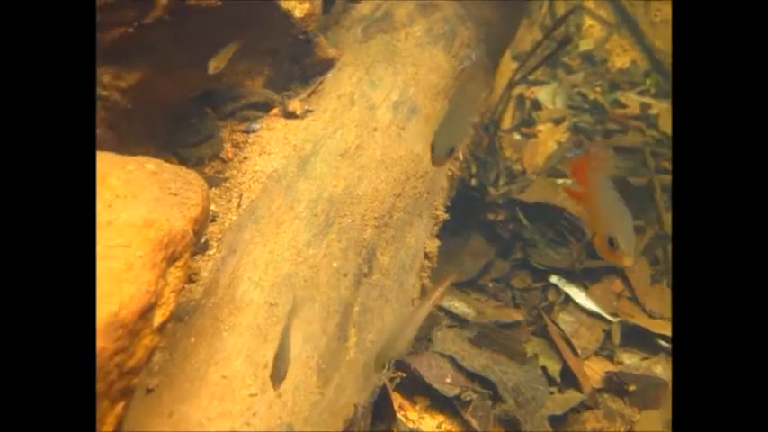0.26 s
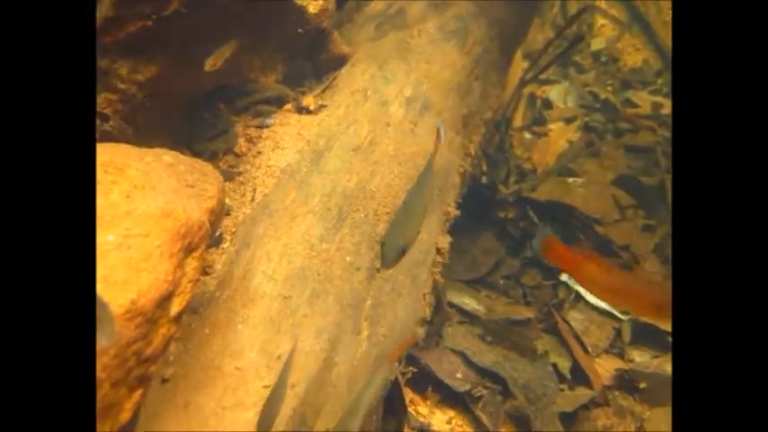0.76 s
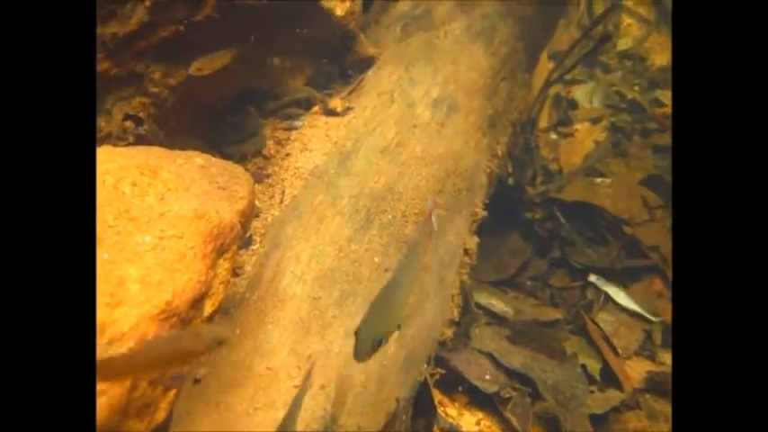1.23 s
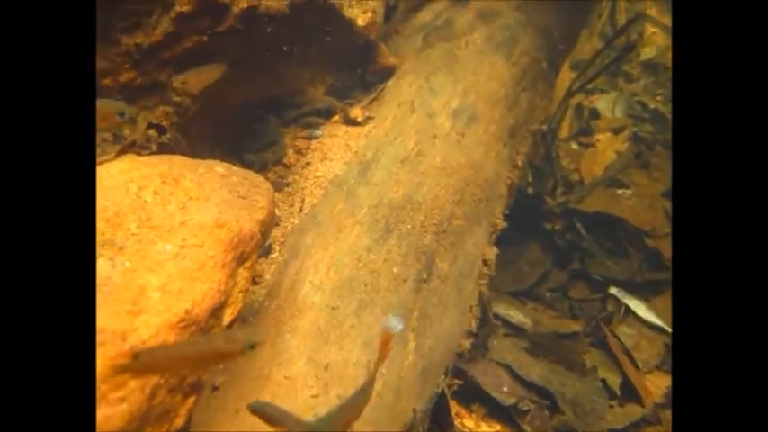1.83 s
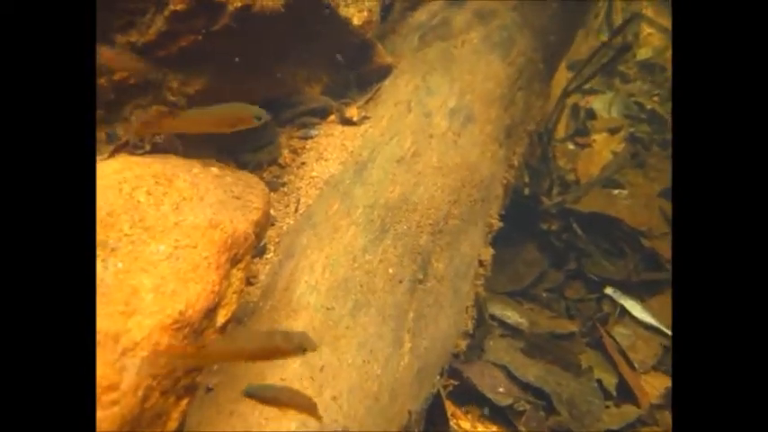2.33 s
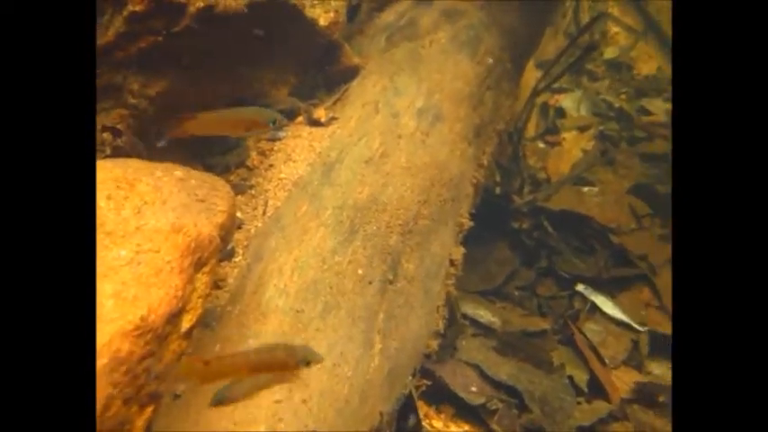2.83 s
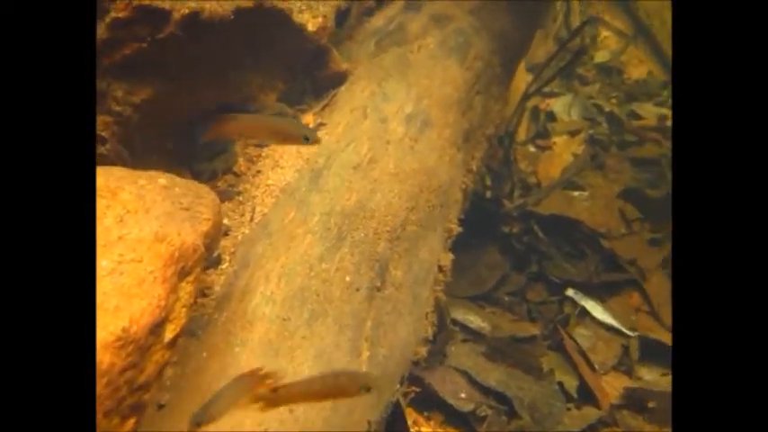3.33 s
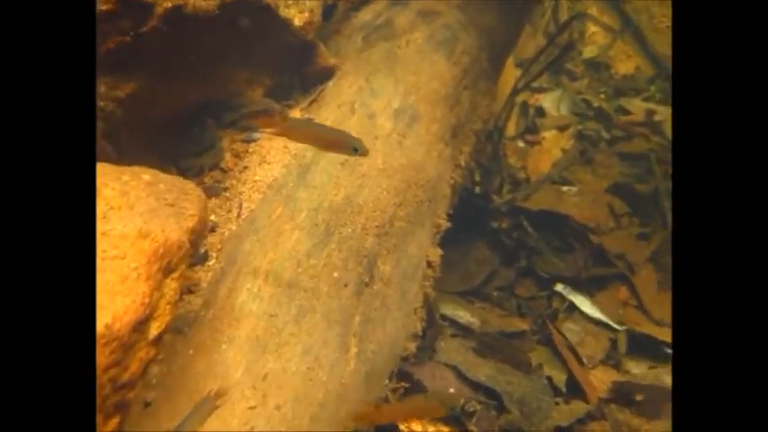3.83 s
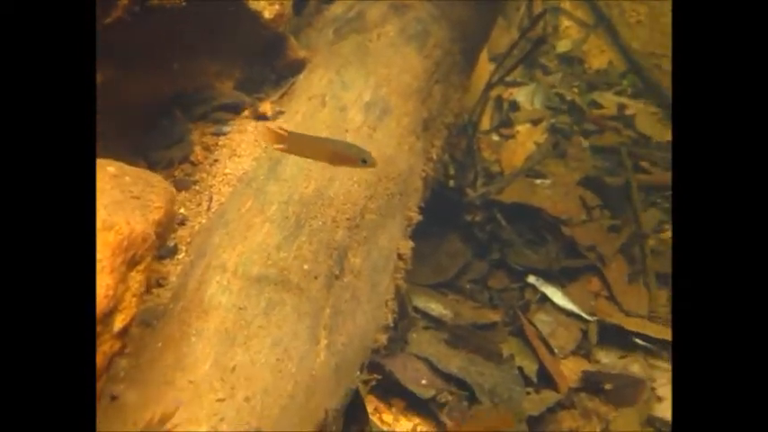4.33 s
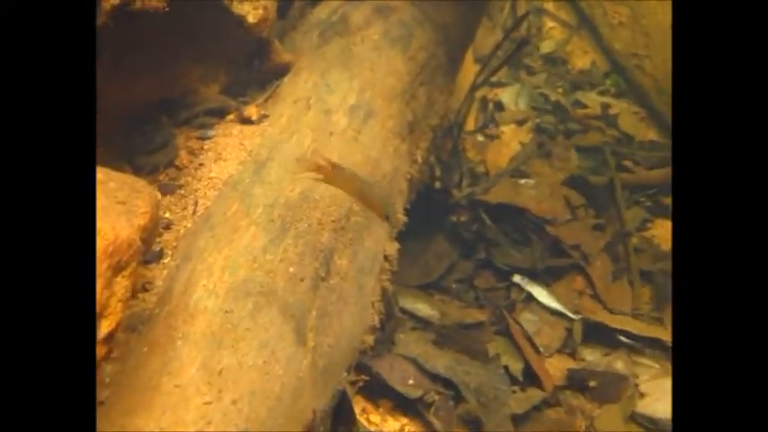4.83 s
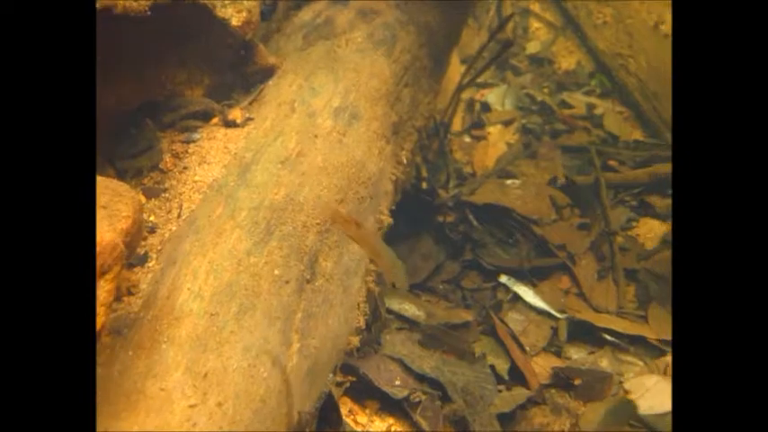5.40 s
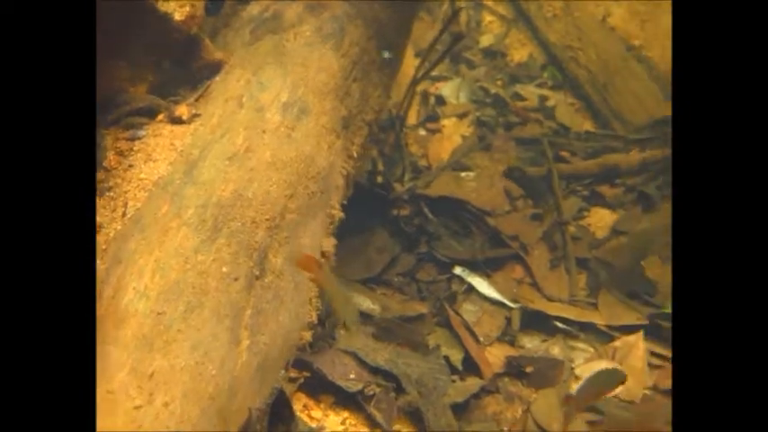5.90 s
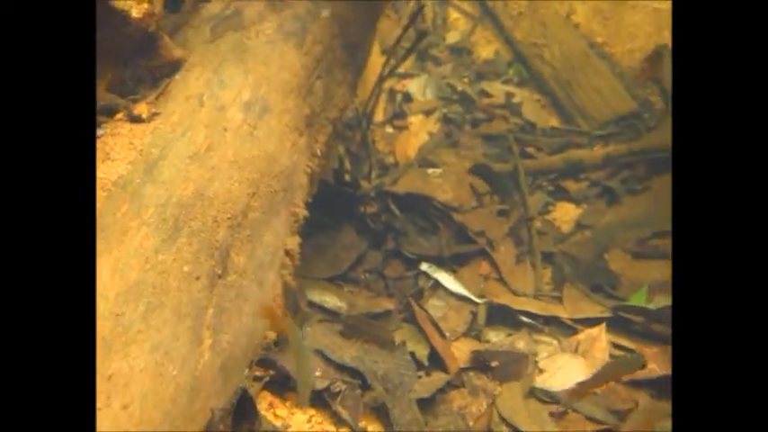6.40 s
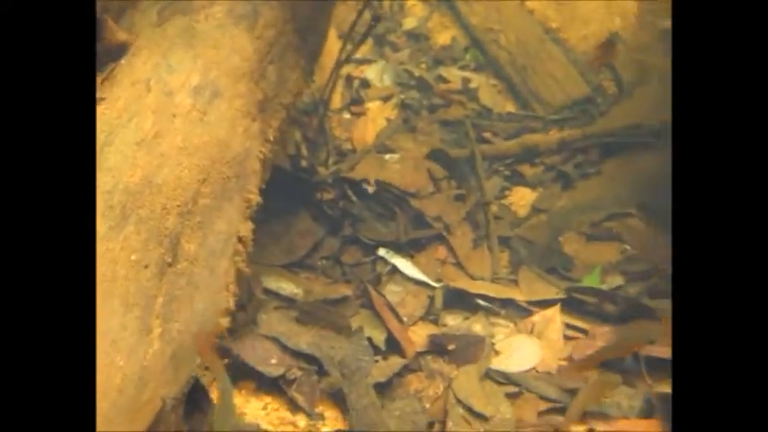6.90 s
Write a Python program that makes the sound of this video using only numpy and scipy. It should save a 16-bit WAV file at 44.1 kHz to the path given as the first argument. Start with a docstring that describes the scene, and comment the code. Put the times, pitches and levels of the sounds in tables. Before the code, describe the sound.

Heard from inside a sealed housing under a shallow stream, the current makes a soft hollow roar and lumpy rumble. Dull knocks, taps and low thuds strike the shell irregularly, with a loud clacking cluster near the start and another at one second. Later hits are sparser and softer, with a few big bubble plops. A faint hiss and thin high whine stay steady. The fish make no sound.

```python
"""Camera under a stream

A camera in a sealed housing lies under a shallow stream. Bubbles and grains tap the shell and make it ring,
eddies push its wall with low thuds, three large bubbles plop, and hard contacts snap like ticks.
Behind them, noise shaped by the housing's resonances makes the current's faint roar, and low noise its rumble.
The electronics add steady noise as hiss, a pure high tone and a whine made of a broken-up sine."""
import sys
import numpy as np
from scipy import signal
from scipy.fft import rfft, irfft, next_fast_len
from scipy.io import wavfile
from scipy.ndimage import map_coordinates

SR = 44100
rng = np.random.default_rng(int(sys.argv[2]) if len(sys.argv) > 2 else 0)


def ratio(d):
    """dB to gain"""
    e = np.asarray(d, float) / 20
    return 10 ** e


def pcm_store(signal):
    """Save signal as 16-bit PCM."""
    levels = np.round(np.clip(np.atleast_2d(signal), -1, 1) * 32767)
    wavfile.write(sys.argv[1], SR, levels.astype(np.int16).T)


N = 315315  # length in samples, 7.15 s


def unit(x):
    """Scale x so that its average strength (rms) is 1."""
    return x / np.sqrt(np.mean(x ** 2) + 1e-20)


def along(points, hz):
    """Read a curve of (frequency, value) points, with frequency on a log axis."""
    f, value = np.transpose(points)
    return np.interp(np.log(hz + 1), np.log(f + 1), value)


def over_time(points):
    """Draw straight lines between (time, value) points, one value per sample."""
    return np.interp(np.arange(N) / SR, *np.transpose(points))


def wobble(rate):
    """A smooth random curve with `rate` random points a second."""
    knots = rng.standard_normal(int(N * rate / SR) + 4)
    return map_coordinates(knots, [np.arange(N) * rate / SR])


def filtered(x, response):
    """Multiply the spectrum of x by a response that depends on frequency."""
    size = next_fast_len(N + 8192)
    hz = np.fft.rfftfreq(size, 1 / SR)
    return irfft(rfft(x, size) * response(hz), size)[..., :N]


def noise(response):
    """Noise coloured by a response, at rms 1."""
    return unit(filtered(rng.standard_normal(N), response))


def ring(modes, db, t, attack):
    """Fading sine waves of a struck body: one row per blow, db gives each blow's strength in each mode."""
    hz, level, t60 = (np.array(column)[None, :, None] for column in zip(*modes))
    fading = ratio(db[:, :, None] + level - 60 * t / t60)
    waves = fading * np.sin(2 * np.pi * hz * t)
    return waves.sum(1) * (1 - np.exp(-t / attack)) ** 2


def placed(seconds, rows):
    """Add up short sounds, each starting at its own moment."""
    at = np.round(seconds * SR).astype(int)[:, None] + np.arange(rows.shape[1])
    # samples outside the scene land in a spare last slot or at sample 0
    return np.bincount(np.clip(at, 0, N).ravel(), rows.ravel(), N + 1)[:N]


# ways the shell rings when tapped: f/Hz, level/dB, t60/s (time to fade by 60 dB)
SHELL_MODES = [(450, 2, 0.026), (564.4, 2, 0.031), (732, -9, 0.061), (880, -5, 0.026), (1029, 13.5, 0.01),
               (1194, 5.5, 0.017), (1434, 1.5, 0.018), (1900, -10, 0.0072)]


def taps(s, db, centre_hz):
    """A bubble or grain taps the shell: a rounded blip at its pitch, then the nearest modes ring on."""
    hz = np.array([mode[0] for mode in SHELL_MODES])
    t = np.arange(SR // 20) / SR
    octaves_away = np.abs(np.log2(hz / centre_hz[:, None]))
    strength = db[:, None] + 5.5 - 45 * octaves_away
    strength = strength + 3.9 * rng.standard_normal(strength.shape)  # no two taps ring alike
    cycles = t * centre_hz[:, None]
    bump = np.exp(-((cycles - 1.2) / 0.62) ** 2)
    blip = ratio(db[:, None] - 11) * bump * np.sin(2 * np.pi * cycles)
    return placed(s + 0.00028, blip + ring(SHELL_MODES, strength, t, attack=0.0012))


# ringing taps on the shell: t/s, level/dB, centre f/Hz, rim level/dB
TAP_EVENTS = [(0.042, -23, 885, -27), (0.064, -20.5, 533, -32), (0.107, -25, 527, -43),
              (0.142, -19, 800, -35), (0.183, -10, 790, -40), (0.189, -7, 810, -15),
              (0.196, -3.5, 900, -10), (0.207, -11, 860, -19), (0.364, -22, 564, -41),
              (0.452, -18, 750, -20.5), (0.473, -18, 800, -25), (0.513, -17, 794, -18.5),
              (0.538, -21, 765, -29), (0.559, -36, 900, -29), (0.602, -21.5, 540, -45),
              (0.94, -25.5, 510, -27), (0.991, -6.5, 737, -13.5), (1.0, -19, 596, -43),
              (1.008, -9, 750, -26), (1.045, -10.5, 880, -34), (1.058, -10, 880, -26),
              (1.078, -17.5, 430, -28), (1.081, -14.5, 740, -30), (1.151, -15.5, 730, -32),
              (1.241, -22, 770, -31), (1.258, -40, 500, -26), (1.28, -22.5, 510, -24.5),
              (1.3, -25, 474, -40), (1.309, -21, 820, -32), (1.473, -11, 804, -21),
              (1.658, -24.5, 470, -45), (2.158, -26, 450, -49), (2.227, -22, 490, -22),
              (2.298, -25.5, 550, -38), (2.654, -14, 870, -33), (2.664, -40, 500, -28),
              (2.691, -25, 780, -22), (2.778, -17.5, 730, -23), (2.783, -47, 450, -14.5),
              (3.011, -31, 500, -22.5), (3.023, -20.5, 410, -26), (3.545, -41, 500, -21),
              (3.76, -24, 470, -28.5), (3.918, -23.5, 810, -25), (3.985, -27.5, 450, -51),
              (4.105, -22.5, 552, -35), (4.343, -22, 790, -27), (4.48, -15.5, 680, -40),
              (4.886, -29, 500, -32.5), (5.324, -24, 485, -31), (5.386, -21.5, 497, -45),
              (5.515, -30, 500, -26.5), (5.63, -24.5, 487, -45), (5.653, -23.5, 484, -45),
              (6.537, -26, 840, -36), (6.546, -38, 500, -22), (6.616, -34, 500, -24.5),
              (6.668, -23, 535, -48), (6.68, -21.5, 460, -47), (6.694, -20, 406, -15),
              (6.701, -25, 790, -40), (6.715, -19.5, 544, -33), (6.821, -23.5, 527, -45),
              (6.852, -23, 570, -47), (6.894, -38, 500, -30), (6.95, -27, 556, -45),
              (6.985, -22.5, 570, -45)]
# pitch at which the rim answers a tap: t/s, f/Hz
RIM_PITCH = [(0, 1274), (1.4, 1220), (2.6, 1400), (7.15, 1403)]


def knocks():
    """Each tap sounds at its own pitch; the rim and the body of the shell answer it."""
    s, db, centre_hz, rim_db = np.transpose(TAP_EVENTS)
    rim_hz = np.interp(s, *np.transpose(RIM_PITCH))
    rim = taps(s, rim_db, rim_hz)
    body = taps(s, db - 6.5, np.full(len(s), 500))  # dB relative to the tap, Hz
    return taps(s, db, centre_hz) + rim + body


def pushes(s, db, hz):
    """An eddy bends the wall in quickly, and it swings back more slowly."""
    u = np.arange(SR // 16) / SR * hz[:, None]  # time counted in periods of hz
    rise = (1 - np.exp(-u / 0.065)) ** 2
    swing = np.sin(2 * np.pi * u ** 0.54) * np.exp(-1.6 * u)  # a power below 1 slows the swing
    return placed(s + 0.00048, ratio(db[:, None] + 5.5) * rise * swing)


# low pushes on the shell: t/s, level/dB, f/Hz (sets how fast each push runs)
PUSH_EVENTS = [(0.142, -15.5, 190), (0.188, -16.5, 274), (0.21, -20, 200), (0.367, -24, 179),
               (0.45, -25, 181), (0.473, -24, 192), (0.513, -20, 202), (0.604, -21.5, 160),
               (0.993, -14, 170), (1.01, -19, 132), (1.025, -21, 160), (1.042, -23, 200),
               (1.057, -14.5, 255), (1.15, -20, 180), (1.244, -26, 119), (1.258, -14, 154),
               (1.3, -18.5, 210), (1.396, -19, 117), (1.458, -22, 202), (1.471, -16, 192),
               (1.508, -23, 220), (1.657, -22, 218), (1.932, -20, 186), (2.302, -21, 123),
               (2.544, -20, 140), (2.654, -15, 192), (2.668, -28, 140), (2.69, -14.5, 165),
               (2.731, -23, 202), (2.778, -10, 204), (2.783, -11, 110), (3.018, -16, 180),
               (3.052, -23, 100), (3.314, -25, 182), (3.363, -22, 136), (3.477, -24, 140),
               (3.545, -14.5, 180), (3.762, -24.5, 210), (3.918, -17.5, 174), (3.946, -16, 127),
               (3.962, -21, 140), (4.028, -23.5, 160), (4.343, -20, 149), (4.484, -10.5, 163),
               (4.713, -23, 98), (4.884, -24, 202), (5.264, -27, 140), (5.387, -19, 160),
               (5.459, -12.5, 150), (5.482, -22.5, 137), (5.624, -26.5, 150), (5.664, -17.5, 159),
               (5.848, -26.5, 90), (6.536, -18, 170), (6.545, -20.5, 112), (6.616, -16.5, 149),
               (6.653, -24, 200), (6.668, -19, 180), (6.694, -12, 147), (6.729, -21, 150),
               (6.746, -18, 172), (6.851, -21, 202), (6.984, -23.5, 161), (7.052, -23, 194)]


def eddy_pushes():
    """The clear low thuds, as eddies bend the wall at the listed moments."""
    return pushes(*np.transpose(PUSH_EVENTS))


# large bubbles: t/s, bend level/dB, ring level/dB
PLOP_EVENTS = [(1.8255, -10.5, -12), (5.16, -7, -8.5), (6.21, -14.5, -7.5)]


def plops():
    """A large bubble lets go of the shell: the wall is sucked out, swings back ever slower, and one mode sings."""
    s, bend_db, ring_db = np.transpose(PLOP_EVENTS)
    t = np.arange(-SR // 200, SR // 20) / SR
    before, after = np.minimum(t, 0), np.maximum(t, 0)
    bend_shape = np.exp(-(before / 0.00051) ** 2 - (after / 0.0055) ** 2)
    bend = np.cos(np.pi * (after / 0.0022) ** 0.6) * bend_shape
    sing_shape = np.exp(-(before / 0.0017) ** 2 - after / 0.0059)
    sing = np.cos(2 * np.pi * SHELL_MODES[1][0] * t) * sing_shape
    return placed(s + t[0], -ratio(bend_db)[:, None] * bend - ratio(ring_db)[:, None] * sing)


# hard ticks: t/s, level/dB, centre f/Hz, crack level/dB (relative to the tick)
TICK_EVENTS = [(.142, -37, 3010, -30), (.189, -28, 2400, -25), (.193, -24, 4500, -20),
               (.197, -3.5, 3600, -10), (.209, -20, 3050, -35), (.474, -40, 2840, -30),
               (.514, -34.5, 2760, -30), (0.989, -32, 2660, -21), (1.059, -12, 3370, -19),
               (1.074, -38, 4500, -30), (1.08, -34, 4500, -30), (1.402, -44, 2620, -30),
               (2.225, -38.5, 4250, -25), (2.296, -32, 4480, -10), (2.778, -33, 2400, -35),
               (3.96, -41, 4500, -30), (6.517, -39, 3960, -30)]
# ways the shell rings when ticked: f/Hz, level/dB, t60/s
TICK_MODES = [(1110, 7, 0.0072), (2400, -6.5, 0.011), (2750, -1.5, 0.0071), (4600, 1, 0.0045),
              (5380, -13.5, 0.0072)]


def ticks():
    """Hard contacts: a crack of noise, very short modes strongest near each tick's centre, a faint fizzing tail."""
    s, db, centre_hz, crack_db = np.transpose(TICK_EVENTS)
    hz = np.array([mode[0] for mode in TICK_MODES])
    t = np.arange(SR // 25) / SR
    strength = db[:, None] + 4.5 - 9 * np.abs(np.log2(hz / centre_hz[:, None]))
    modes = placed(s, ring(TICK_MODES, strength, t, attack=0.0001))

    shape = (len(s), len(t))
    crack = ratio((db + crack_db + 3)[:, None] - 60 * t / 0.0035) * rng.standard_normal(shape)
    fizz = ratio(db[:, None] - 17.5 - 60 * t / 0.028) * rng.standard_normal(shape)
    dull_crack = filtered(placed(s, crack), lambda f: 1 / (1 + 1j * f / 9000))
    tail = filtered(placed(s, fizz), lambda f: np.exp(-((f - 3200) / 1800) ** 2))
    return dull_crack + tail - modes


def patter(count=340):
    """Many faint pushes and taps at random moments under the clear ones; higher taps tend to be weaker."""
    push_s, tap_s = rng.random((count, 2)).T * N / SR
    a, b, c, d = rng.standard_normal((count, 4)).T
    faint_pushes = pushes(push_s, -35 + 3 * a, 110 * np.exp(0.5 * b))
    faint_taps = taps(tap_s, -39 + 3 * c - 4 * d, 750 * np.exp(0.498 * d))
    return faint_pushes + faint_taps


# slow strength of the eddies: t/s, level/dB
EDDY_STRENGTH = [(0, -33), (1, -41.5), (2.5, -44), (3.2, -41.5), (5, -42.5), (6.3, -43), (7.15, -41)]


def surges():
    """Loudness of the eddies' rumble: a slow strength, and a swell around each push."""
    surge_db, surge_s = -19, 0.022  # level relative to the push, half length
    s, db, _ = np.transpose(PUSH_EVENTS)
    t = np.arange(-SR // 5, SR // 5) / SR
    swell_power = ratio(db + surge_db)[:, None] ** 2 * np.exp(-(t / surge_s) ** 2)
    return np.sqrt(ratio(over_time(EDDY_STRENGTH)) ** 2 + placed(s + t[0], swell_power))


# resonances of the hollow housing: f/Hz, width/Hz, level/dB
HOUSING_MODES = [(444.3, 65.6, 4.5), (570, 53, -0.5), (680, 26, -8), (976, 46, -8), (1220, 27, -18),
                 (1514, 79, -9.5), (1933, 53.5, -10), (4480, 91, -58)]


def hollow(f):
    """Response of the housing: resonances added with alternating sign."""
    total = 0
    for k, (centre, width, db) in enumerate(HOUSING_MODES):
        peak = 1j * f * width / (centre * centre - f * f + 1j * f * width)
        total = total + (-1) ** k * ratio(db) * peak
    return total


# strength of the current's roar: t/s, level/dB
ROAR_STRENGTH = [(0, -35.5), (1.4, -35.5), (2, -35.5), (4.5, -37), (7.15, -36)]
# colour of the broad part of the roar: f/Hz, level/dB (relative, per Hz)
BROAD_COLOUR = [(100, -49), (250, -22), (600, -11), (1200, -15.5), (2200, -22.5), (2600, -28),
                (5000, -41.5), (8000, -75)]
# colour of the eddies' rumble: f/Hz, level/dB (relative, per Hz)
RUMBLE_COLOUR = [(8.8, -43), (15, 3.5), (60, 1), (87, -8), (179, -13), (350, -9.5), (460, -16), (770, -120)]


def current():
    """Flow noise: a lumpy rumble, and a roar heard through the hollow housing."""
    roar = noise(lambda f: np.hypot(np.abs(hollow(f)), ratio(along(BROAD_COLOUR, f))))
    rumble = noise(lambda f: ratio(along(RUMBLE_COLOUR, f)))
    roar_gain = ratio(over_time(ROAR_STRENGTH) + 1.05 * wobble(15))
    rumble_gain = surges() * ratio(2.4 * wobble(20))
    return roar_gain * roar + rumble_gain * rumble


# colour of the electronic hiss: f/Hz, level/dB (relative, per Hz)
HISS_COLOUR = [(1470, -39), (2500, -6), (4620, -2), (6350, -19), (7590, -10), (8080, -13), (8400, -8),
               (13100, -12.5), (16000, -15.5)]


def electronics():
    """Steady hiss, a pure high tone, and a whine that flips sign once a picture frame and drops out half-way."""
    frame_hz, whine_hz, pure_hz = 30 / 1.001, 7867.13, 12600
    t = np.arange(N) / SR
    flips = np.sign(np.sin(np.pi * frame_hz * (t - 0.0178)))
    gap = (frame_hz * (t - 0.0008)) % 1 < 0.035  # silent for 3.5 % of each frame
    whine = ratio(-53.5) * flips * (1 - gap) * np.sin(2 * np.pi * whine_hz * t)
    pure = ratio(-65.5) * np.sin(2 * np.pi * pure_hz * t)
    hiss = ratio(-59.5) * noise(lambda f: ratio(along(HISS_COLOUR, f)))
    return whine + pure + hiss


def scene():
    """Everything added up at the one microphone."""
    blows = knocks() + eddy_pushes() + plops() + ticks() + patter()
    return (blows + current() + electronics())[None]


def low_pass(x):
    """Removes everything above the highest recorded frequency."""
    return signal.sosfilt(signal.butter(12, 16810, fs=SR, output="sos"), x)


def record(dry):
    """The input stage squashes the loudest peaks; a notch darkens the treble; a band limit ends it."""
    full_scale = 0.92
    notch_hz, top_hz = 6280, 15780
    squashed = dry / (1 + np.abs(dry / full_scale) ** 6) ** (1 / 6)

    def notch_and_limit(f):
        """A deep dip around notch_hz, and nothing from top_hz up."""
        offset = notch_hz ** 2 - f * f
        return (offset + 1j * f * 30) / (offset + 1j * f * 1500) * (f < top_hz)

    return low_pass(filtered(squashed, notch_and_limit))


dry = scene()
out = record(dry)
pcm_store(out)
```